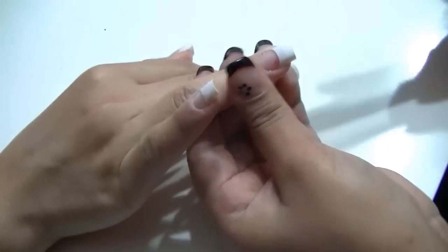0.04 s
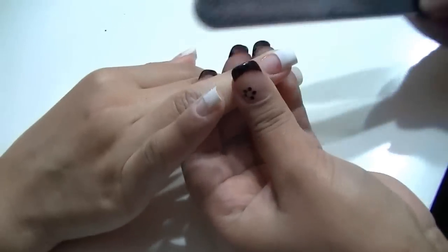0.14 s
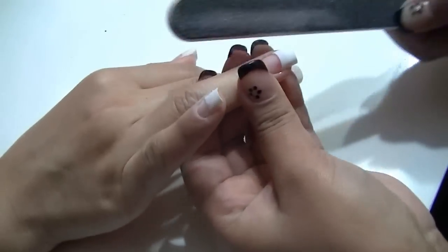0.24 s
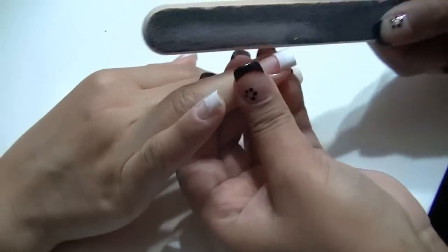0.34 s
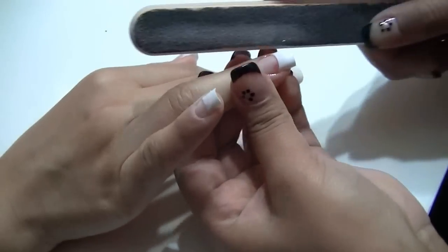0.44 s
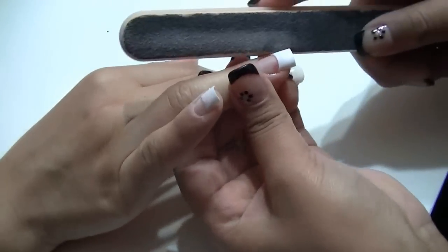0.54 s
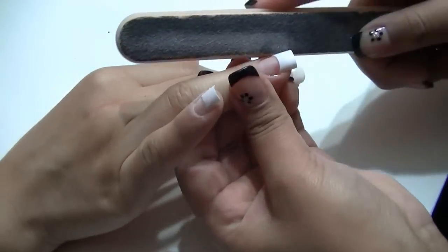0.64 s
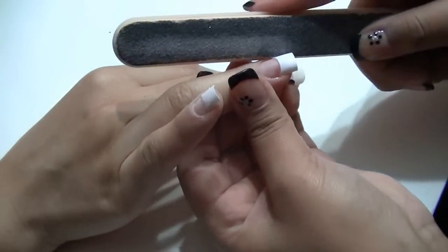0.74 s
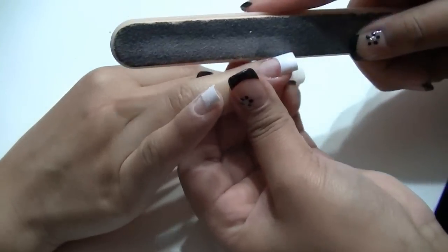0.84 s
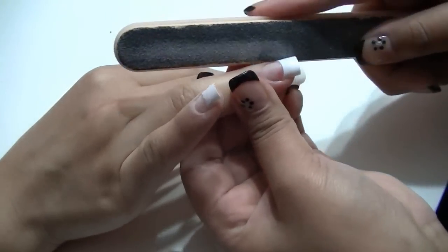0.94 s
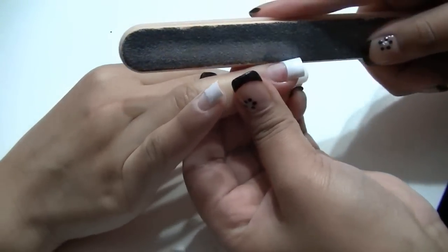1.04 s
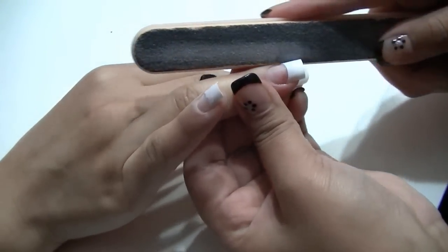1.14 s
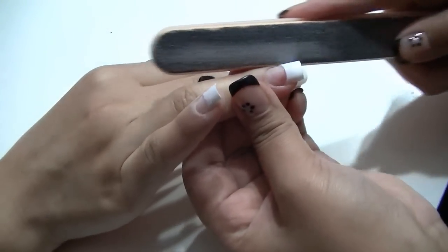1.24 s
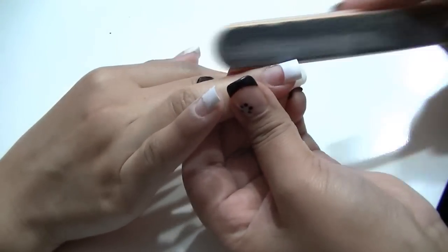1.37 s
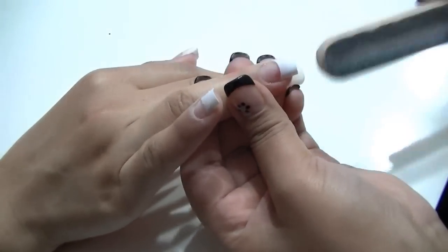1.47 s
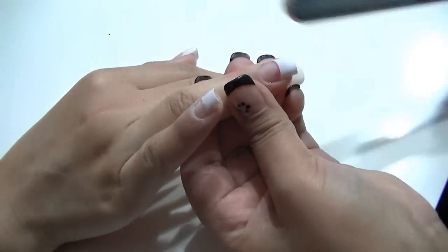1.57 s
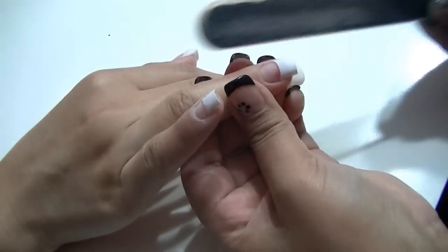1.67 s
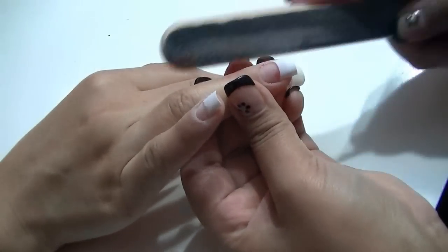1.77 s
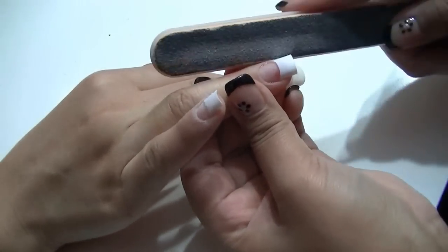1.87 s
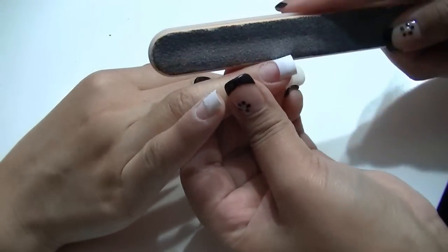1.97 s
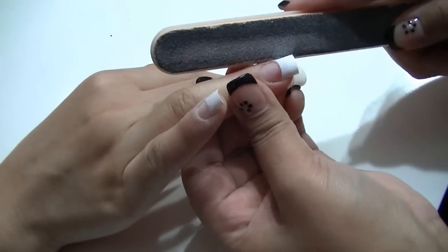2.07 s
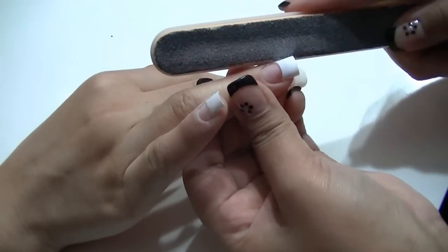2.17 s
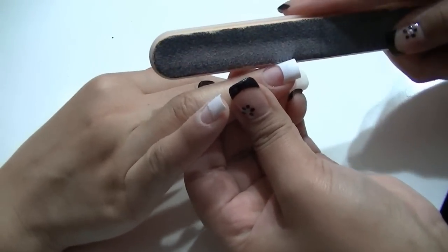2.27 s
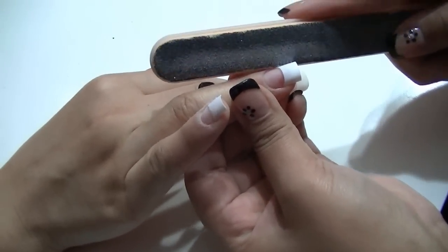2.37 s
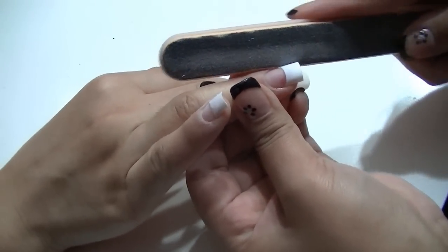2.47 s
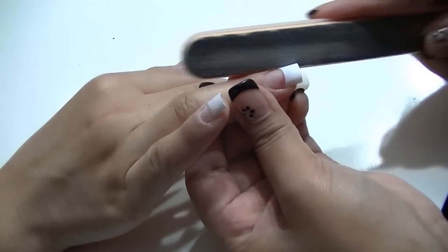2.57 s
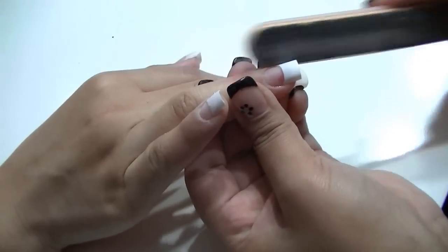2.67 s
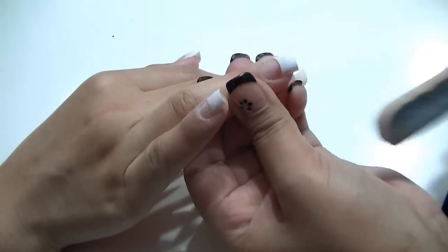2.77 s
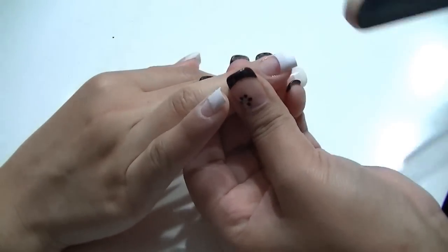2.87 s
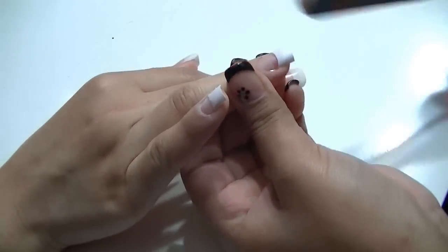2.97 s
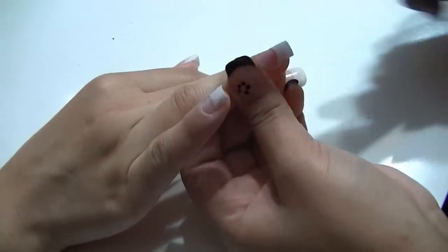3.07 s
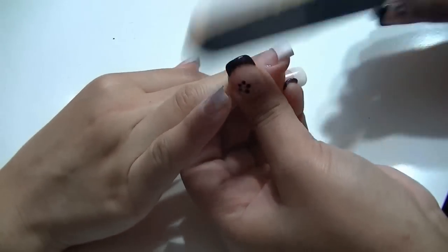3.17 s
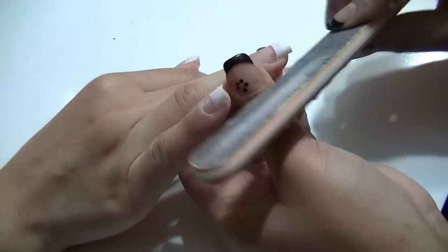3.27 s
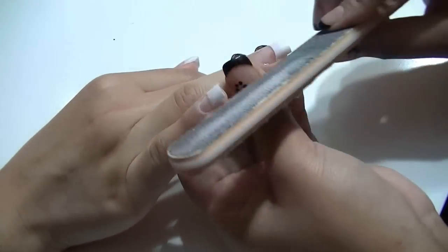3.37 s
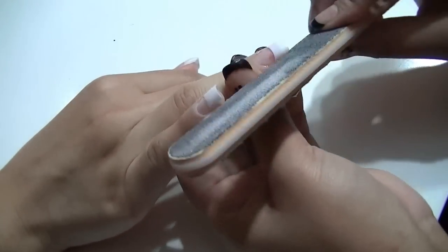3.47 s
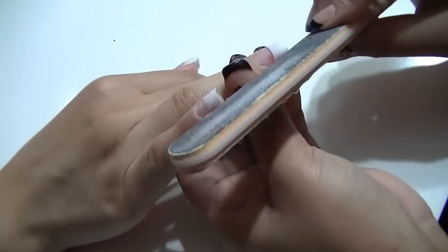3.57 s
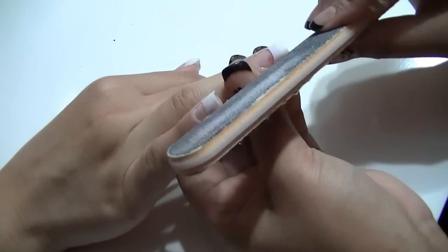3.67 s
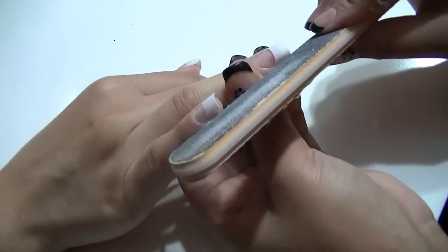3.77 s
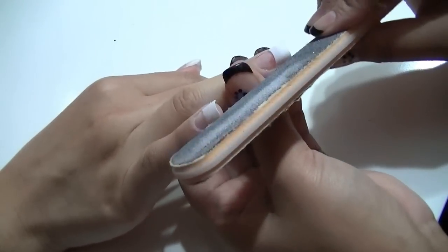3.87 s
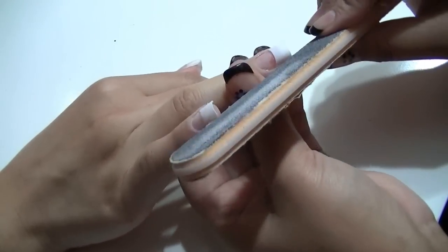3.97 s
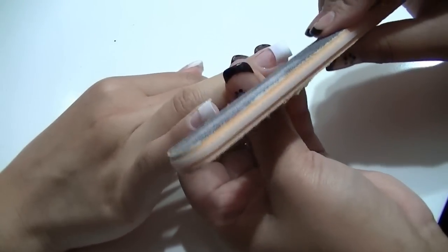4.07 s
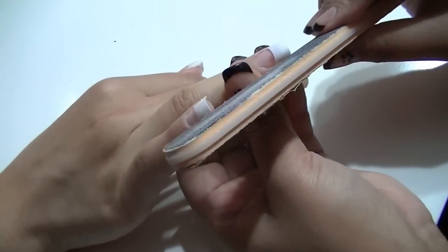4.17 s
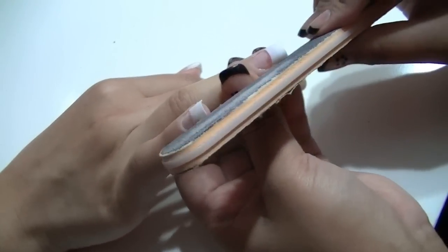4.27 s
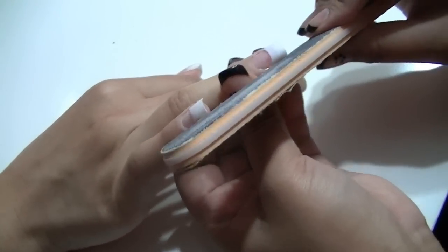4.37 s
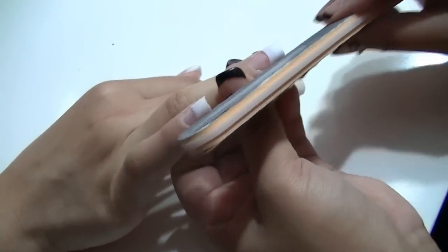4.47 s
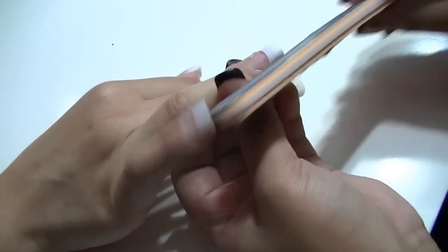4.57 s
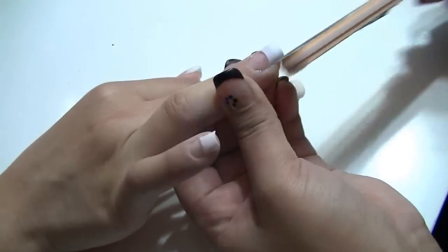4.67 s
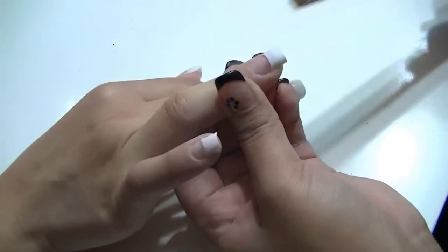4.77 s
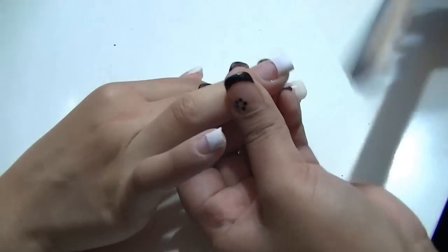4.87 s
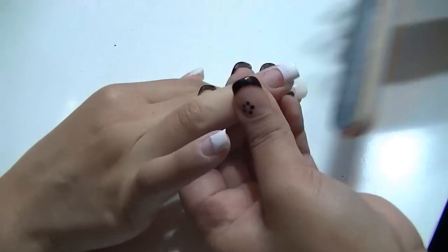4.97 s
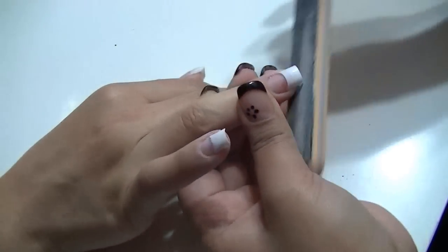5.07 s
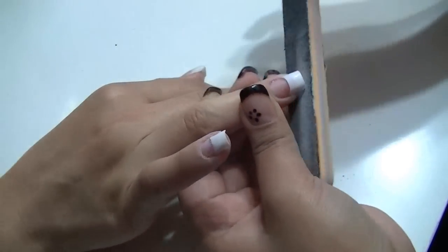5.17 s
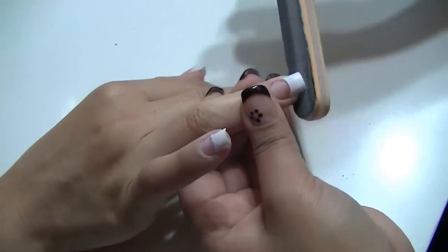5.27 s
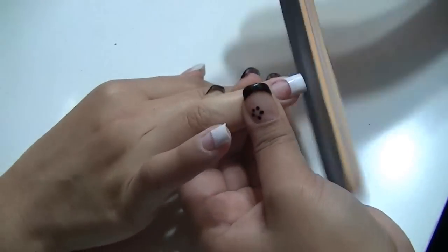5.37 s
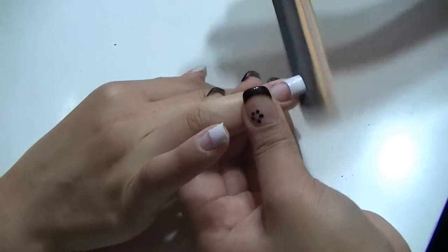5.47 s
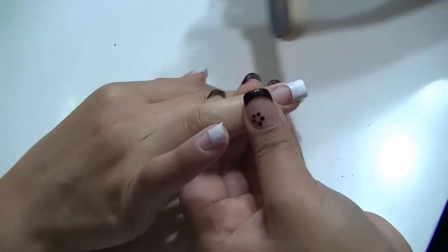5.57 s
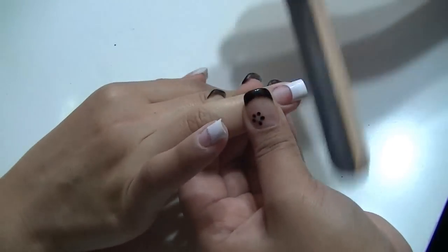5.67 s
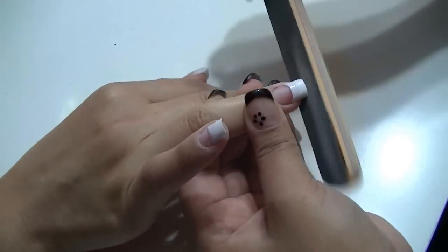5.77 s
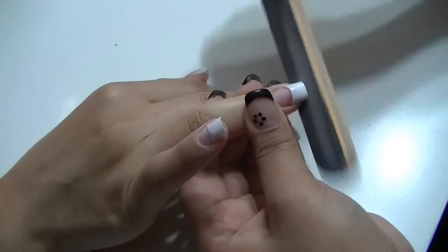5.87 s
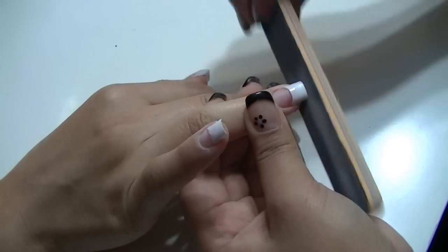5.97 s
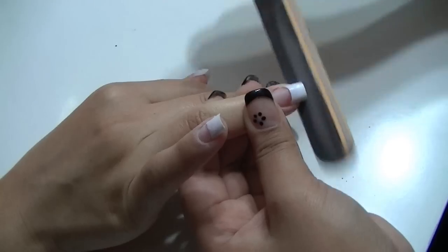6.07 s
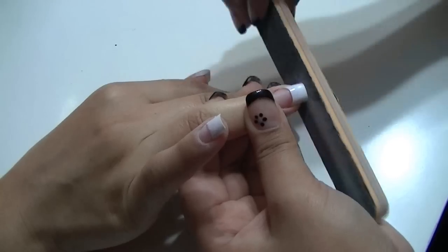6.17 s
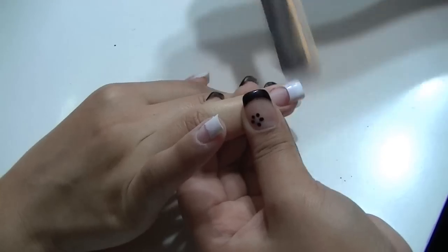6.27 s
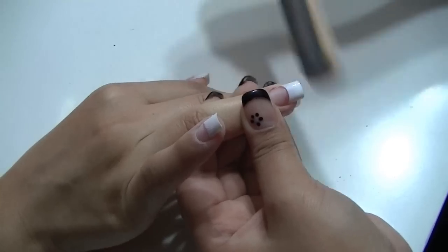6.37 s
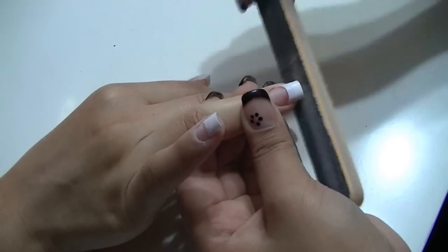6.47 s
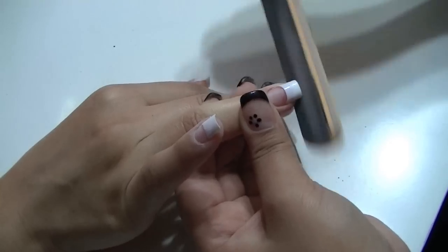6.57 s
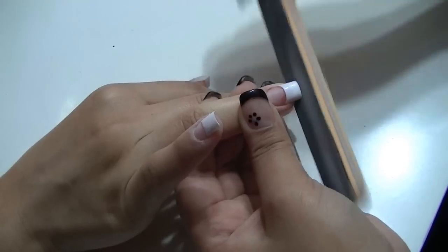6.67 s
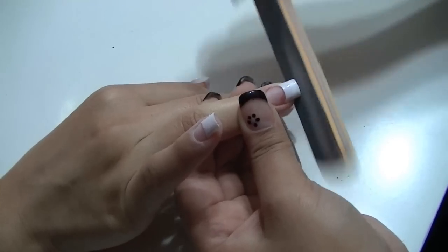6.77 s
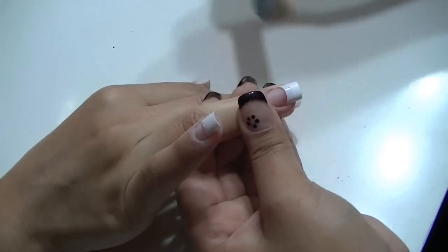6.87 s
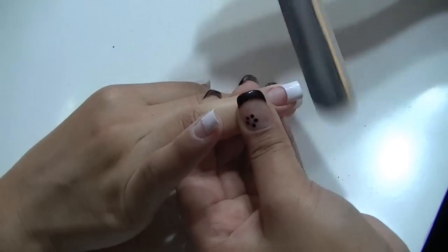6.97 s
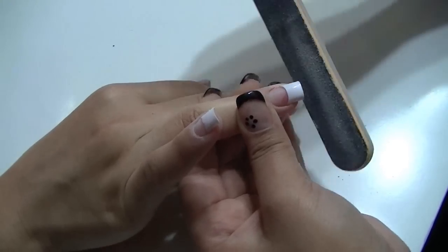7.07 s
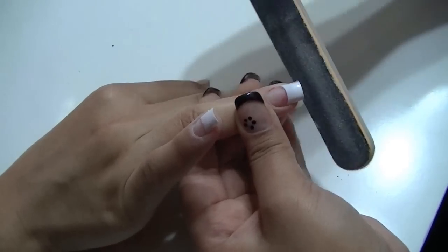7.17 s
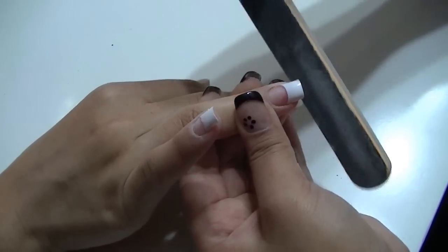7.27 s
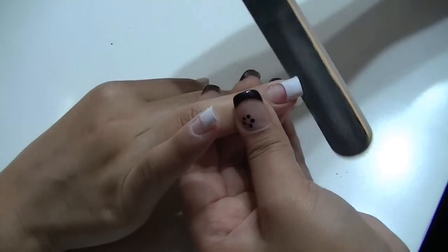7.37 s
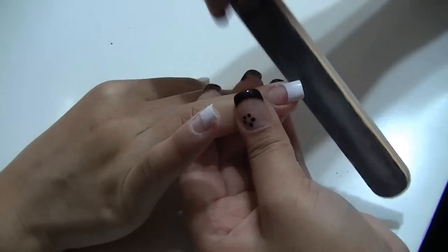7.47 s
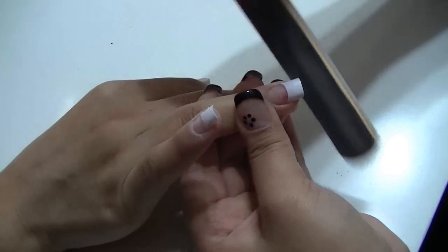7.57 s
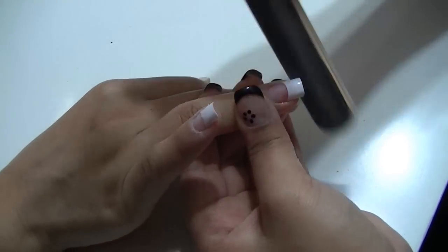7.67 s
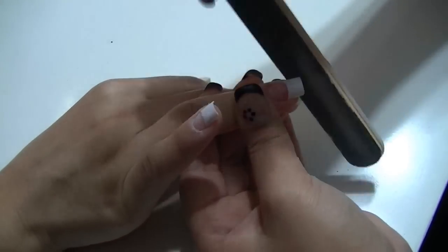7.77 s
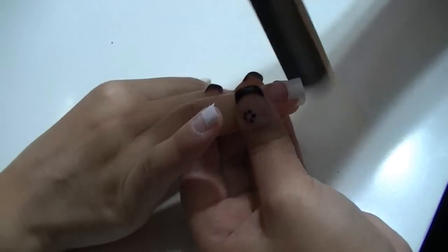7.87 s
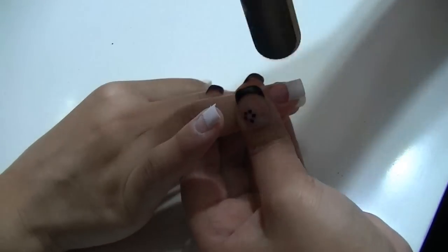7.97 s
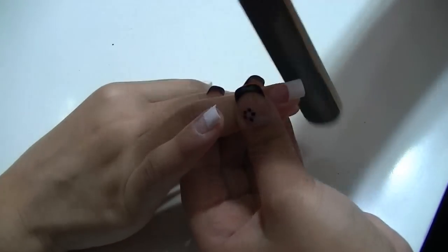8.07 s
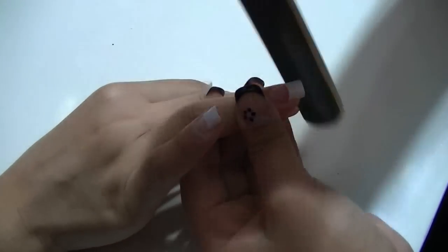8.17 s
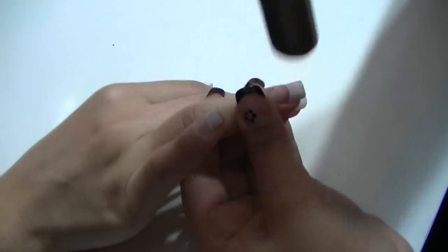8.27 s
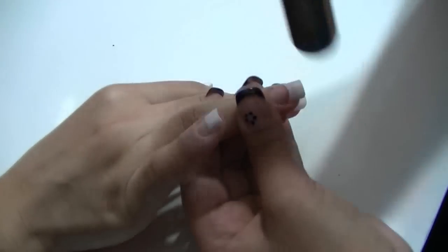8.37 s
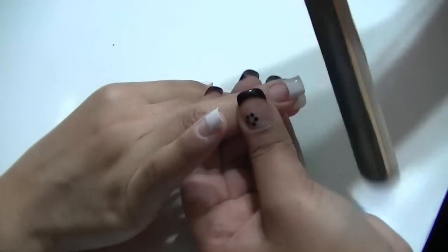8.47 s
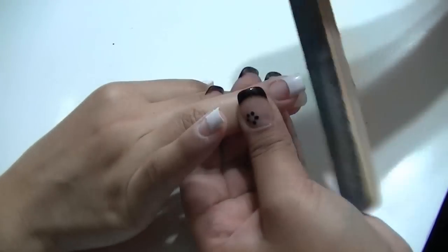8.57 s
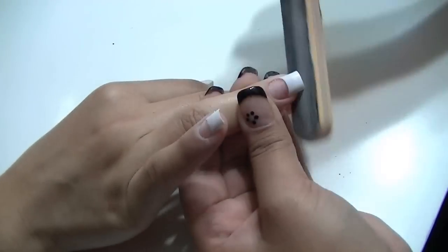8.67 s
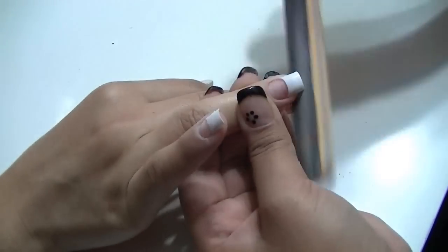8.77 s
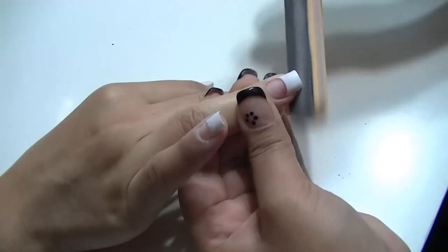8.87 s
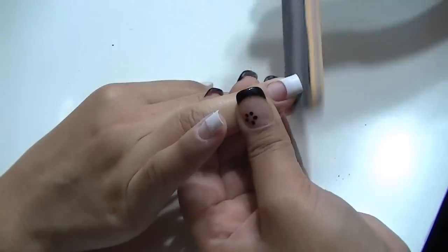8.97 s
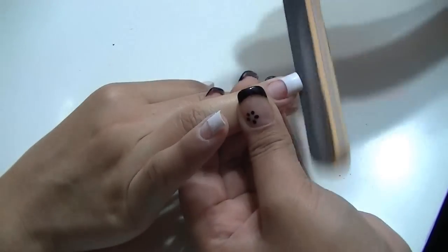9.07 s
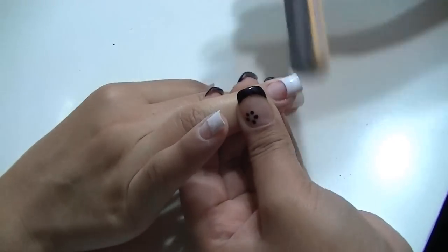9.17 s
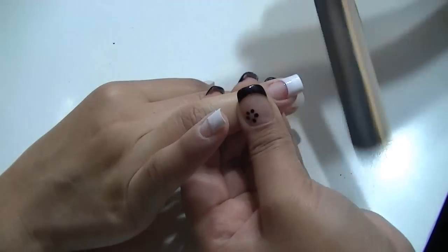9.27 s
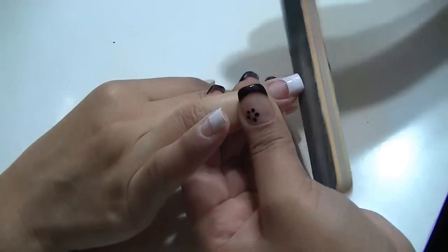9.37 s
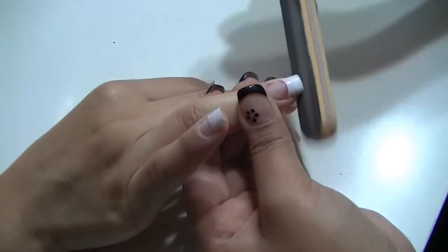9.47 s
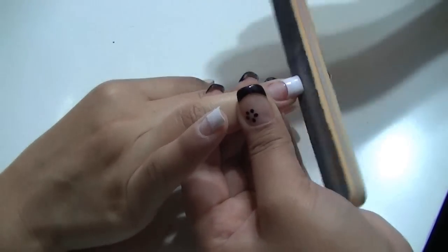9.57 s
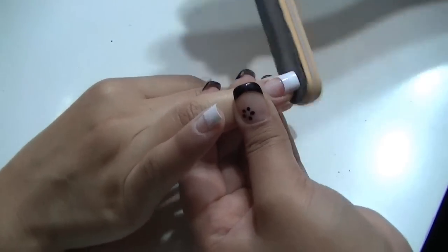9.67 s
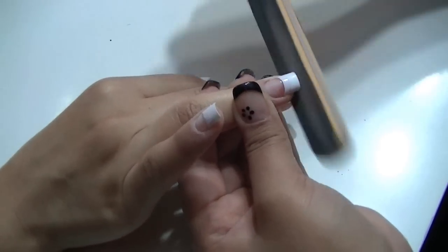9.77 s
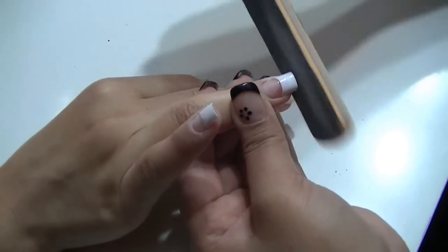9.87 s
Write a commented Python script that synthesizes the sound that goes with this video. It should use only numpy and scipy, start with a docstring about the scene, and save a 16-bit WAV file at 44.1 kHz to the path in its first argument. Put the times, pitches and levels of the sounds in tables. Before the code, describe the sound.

Hands handle a false nail and an emery board close to the microphone. At first there are sparse ticks, smooth light scrapes and dull little bumps on the table. The second half is brisk filing: gritty, hissy back-and-forth strokes with a woody undertone and crackly snags, grouped into four uneven runs. A low appliance hum and soft air noise stay beneath, with only a short room echo.

```python
"""In a small room with a humming appliance, an emery file shapes a false nail tip close to the listener.
Soft sweeps, scuffs and light knocks come first, then four runs of quick back-and-forth strokes.
Grit is noise of uneven level and stick-slip is a train of short bursts; both excite the resonances of
the tip (high) and the file board (lower). Fingers and table ring as damped modes, and echoes are added."""
import sys
import numpy as np
from scipy import signal
from scipy.fft import rfft, irfft
from scipy.io import wavfile
from scipy.ndimage import uniform_filter1d

SR = 44100
rng = np.random.default_rng(int(sys.argv[2]) if len(sys.argv) > 2 else 0)


def generate_wav(sig):
    """Save sig (samples, or channels by samples) to the path in sys.argv[1] as 16-bit PCM at SR."""
    pcm = np.round(np.clip(np.atleast_2d(sig).T, -1, 1) * 32767).astype(np.int16)
    wavfile.write(sys.argv[1], SR, pcm)


N = 437472
TIME = np.arange(N) / SR  # s

# appliance hum: [f/Hz, mean rms level/dB]
HUM = [(99.9, -81), (199.8, -71.5), (299.7, -67), (399.6, -57.5)]
# spectrum of the room air: [f/Hz, relative level/dB]
AIR = [(20, 1), (50, 2.5), (100, -3), (160, 3), (240, 1), (340, 2), (470, -0.5), (700, -4.5), (920, -3),
       (1300, -7), (4000, -11), (7000, -16), (12000, -21), (16000, -27)]
AIR_DB = -59.5  # rms level of the air's mid signal above 600 Hz
# left-right difference of the air: [f/Hz, side re mid level/dB]
AIR_SIDE = [(25, -9), (70, -8), (200, -6.5), (600, -5), (2000, -6.5), (6000, -8.5), (12000, -20.5),
            (16000, -10)]
# left-right difference of the close echoes: [f/Hz, side re echo level/dB]
CLOSE_SIDE = [(100, -27), (500, -23), (1000, -38.5), (2500, -50.5), (4500, -31.5), (8000, -24),
              (12000, -36), (16000, -45)]

# brief scuffs and ticks of file or nails: [centre t/s, length t/s, level/dB, tilt/(dB per octave)]
SCUFFS = [(0.122, 0.0018, -45.5, 1), (0.7605, 0.00077, -33.5, 5), (1.143, 0.0019, -35.5, 3),
          (1.331, 0.002, -27.5, 1.5), (1.5178, 0.0054, -27, 1), (2.15, 0.013, -54, 0.5),
          (2.799, 0.0056, -20, 3.5), (2.8048, 0.0016, -21, -1.5), (2.971, 0.014, -42, 2.5),
          (3.0515, 0.0029, -36.5, 2.5), (3.215, 0.012, -43.5, 2), (3.2591, 0.0025, -35.5, -1),
          (3.419, 0.0047, -52, 1), (3.542, 0.0028, -49.5, -5), (3.7859, 0.0013, -45.5, 1),
          (4.0616, 0.0031, -41.5, 1), (4.4628, 0.0018, -34.5, -1), (4.633, 0.0022, -31.5, 2),
          (4.764, 0.0064, -29, 0), (5.795, 0.001, -37.5, 7), (7.093, 0.0055, -42.5, -7.5),
          (7.14, 0.0046, -52.5, -0.5), (8.0935, 0.0018, -38, 1.5), (8.195, 0.0013, -38.5, 5)]
# spectrum of a scuff before its tilt: [f/Hz, relative level/dB]
SCUFF_COLOUR = [(60, -36.0), (300, -0.5), (900, 1), (2200, 2), (4500, 0), (7000, 2), (11000, -0.5),
                (13500, -10), (16000, -29)]

# the flat of the file sweeps softly over the nail:
# [start t/s, end t/s, final level/dB, swell since the start/dB, finger thrum re grit level/dB]
SWEEPS = [(0.162, 0.25, -61.5, -10, -16), (1.222, 1.491, -40, 14, -12.5), (2.55, 2.813, -44.5, 11.5, -18),
          (3.205, 3.357, -55.5, -7.5, -9), (4.163, 4.198, -57.5, -5, -20), (4.463, 4.768, -40, 8, -23.5),
          (4.872, 4.944, -49, 5, -12)]
# spectrum of the sweeps: [f/Hz, relative level/dB]
SWEEP_COLOUR = [(60, -14), (130, 4.5), (300, 2), (560, 5.5), (800, 5), (1150, -1.5), (2100, 5.5),
                (2800, 1.5), (4400, 4.5), (5400, 2.5), (7000, 5.5), (11000, 3), (13500, -5), (16000, -18)]
SWEEP_ATTACK_S, SWEEP_RELEASE_S = 0.018, 0.023

# light knocks of the hands on the table: [t/s, relative level/dB, top f/Hz of the blow (lower is softer)]
KNOCKS = [(0.578, -26.5, 3600), (0.896, -31, 1600), (2.8053, -32, 3600), (3.26, -34.5, 1500)]
# damped modes of the table: [f/Hz, width f/Hz, weight level/dB]
TABLE_MODES = [(192, 77, -2), (537, 210, -2.5), (882, 70, 7), (990, 130, -12), (1250, 84, -2),
               (1470, 180, -15), (2080, 680, -16), (3120, 290, -9.5)]

# fine ticks while the file creeps on the tip: (start t/s, end t/s, relative level/dB)
CREEP = (0.86, 1.25, -63)
# spectrum of the creep: [f/Hz, relative level/dB]
CREEP_COLOUR = [(3000, -28), (8000, -13), (11500, -3), (14000, -3), (16000, -12)]

# a hand settles on the table with a dull low bump: [t/s, level/dB before decay]
BUMPS = [(2.806, -44), (2.98, -52), (3.535, -53)]
BUMP_HZ, BUMP_DECAY_S = 45, 0.016

# file strokes: [start t/s, end t/s, relative level/dB, late minus early level/dB,
# chatter re grit level/dB and board re grit level/dB, both before fixed offsets]
STROKES = [(5.144, 5.233, -50, -2, -2.5, -3.5), (5.258, 5.362, -34.5, -1, -2, -1),
           (5.379, 5.45, -33.5, 0.5, 1.5, -4.5), (5.486, 5.59, -27, 6, -7, -4.5),
           (5.82, 5.904, -34, 4, -5, -3.5), (5.93, 6.029, -29, -4, -1.5, -7),
           (6.034, 6.124, -28.5, 5.5, -1, -4), (6.145, 6.227, -30, 2, 3.5, -6),
           (6.262, 6.36, -21.5, 0, -13.5, -10), (6.574, 6.665, -30.5, 4, -9, -6.5),
           (6.697, 6.779, -30.5, 2.5, -8, -6.5), (6.809, 6.904, -25, 0, -8.5, -5),
           (7.249, 7.278, -46, -5, 1, 0.5), (7.374, 7.46, -35.5, -5, 4, -9.5),
           (7.493, 7.565, -29, -6, 2, -6.5), (7.601, 7.714, -28, -4.5, 2, -10),
           (7.738, 7.83, -32.5, -9, -6, -7), (7.868, 7.984, -26.5, -2.5, -8.5, -10.5),
           (8.227, 8.314, -27, -4, -7, -7.5), (8.666, 8.779, -34.5, -0.5, -6.5, -7),
           (8.796, 8.858, -35, 6.5, -4, -7), (8.895, 8.998, -31, -1.5, -6, -2.5),
           (9.021, 9.114, -33.5, 11, -12, -8.5), (9.136, 9.245, -31.5, 5.5, -7, -1.5),
           (9.426, 9.536, -38, 2.5, -4, -1.5), (9.556, 9.651, -38, -5.5, 2.5, -3),
           (9.667, 9.763, -29, -3, -3.5, -3), (9.78, 9.873, -39, 21, -11, -7.5)]
# the tip snags on the grit and judders free: [t/s, judder length t/s, relative first snap level/dB]
SNAGS = [(5.392, 0.029, -16), (5.4973, 0.006, -0.5), (5.5422, 0, -8), (5.5618, 0.0017, -4.5),
         (5.5853, 0.0013, -13), (5.8645, 0.0091, -5), (5.9403, 0.071, -2.5), (6.045, 0.00067, -13.5),
         (6.0947, 0.02, -11), (6.149, 0.084, -1), (6.2574, 0.0037, -9.5), (6.6653, 0, -17),
         (6.702, 0.0033, -10), (6.8098, .008, -13), (6.8468, 0.018, -4.5), (6.8957, 0, -12),
         (7.2518, 0.00064, -13), (7.385, .055, -5.5), (7.496, 0.0084, -4.5), (7.6002, 0, -14),
         (7.657, 0.045, -6), (7.743, .006, -7.5), (7.8944, 0.00025, -5.5), (7.9332, 0.0013, -2.5),
         (7.9763, 0, -2), (8.2451, 0.012, -6), (8.914, 0.032, -12), (9.517, 0.001, -17), (9.6685, 0, -13.5),
         (9.8558, 0.0034, -11.5), (9.9177, 0.0034, -12)]
# resonance of the nail tip for each angle at which the file is held: [f/Hz, relative level/dB]
TIP_UPRIGHT = [(3500, -39.5), (4800, -26), (5800, -5.5), (7000, -2.5), (7800, -2.5), (9200, 2.5),
               (10200, 0), (11400, 2.5), (12600, -0.5), (14000, -5.5), (15500, -17), (17000, -39)]
TIP_SLANTED = [(3500, -29.5), (4400, -4.5), (5100, -4.5), (5650, 2), (6700, 2), (7400, -2), (8700, 4),
               (9700, -3), (10900, 6.5), (11700, 4), (12400, -7), (13600, -1.5), (15000, -10), (17000, -60)]
TIP_EDGE_ON = [(3500, -28.5), (4800, -17), (6000, -3.5), (6900, -0.5), (8200, -4), (9200, 3), (10100, -1.5),
               (11000, 2), (12400, -3), (14000, -6.5), (15500, -16), (17000, -44)]
# how each run of strokes is played:
# [from t/s, resonance of the tip, mid-stroke swell level/dB, thrum level/dB for a typical stroke]
RUNS = [(5.0, TIP_UPRIGHT, 3.5, -47), (7.1, TIP_SLANTED, -0.5, -47), (8.5, TIP_EDGE_ON, 5, -48.5),
        (9.35, TIP_EDGE_ON, 5.5, -42.5)]
# resonance of the file board: [f/Hz, relative level/dB]
BOARD = [(200, -24.5), (380, -4), (600, 1), (850, 2.5), (1050, -2.5), (1400, 1.5), (1650, 0), (1950, 4.5),
         (2350, 4.5), (2800, -3), (3200, 1), (4600, -1.5), (7000, -14), (14000, -40.5)]
# damped modes of the fingers that hold file and nail: [f/Hz, width f/Hz, weight level/dB]
FINGER_MODES = [(139.4, 40, -3), (210, 62, 5.5), (313, 180, -2.5)]
LEAD_S = 0.023  # the file brushes the tip this long before it bites
STROKE_DB = -30  # a typical stroke
THRUM_FOLLOW = 0.33  # dB of thrum per dB of stroke
JUDDER_HZ, JUDDER_JITTER = 146.8, 0.22  # nominal slip rate; spread of the log interval
JUDDER_FADE_DB, JUDDER_SPREAD_DB = 6, 1  # fall over one judder; random spread of each slip


def undb(db):
    """Level to amplitude: a gain is ten to the power of its decibels over twenty."""
    return 10 ** (np.asarray(db) / 20)


def rms(x):
    """Effective value: the square root of the mean power."""
    return np.sqrt(np.mean(x ** 2))


def response(points, size=2048):
    """Minimum phase: folding the cepstrum of a (Hz, dB) spectrum gives a causal, unit-energy response."""
    hz, db = np.transpose(points)
    freqs = np.maximum(np.fft.rfftfreq(size, 1 / SR), 1)
    magnitude = undb(np.interp(np.log(freqs), np.log(hz), db))
    cepstrum = irfft(np.log(magnitude))
    cepstrum[1:size // 2] *= 2
    cepstrum[size // 2 + 1:] = 0
    h = irfft(np.exp(rfft(cepstrum)))
    return h / np.linalg.norm(h)


def ring(modes, size=8192):
    """Modal superposition: damped cosines, wider modes dying sooner, scaled to unit energy."""
    t = TIME[:size]
    h = np.zeros(size)
    for hz, width, db in modes:
        decay = np.exp(-np.pi * width * t)
        h += undb(db) * width * decay * np.cos(2 * np.pi * hz * t)
    return h / np.linalg.norm(h)


def through(x, h):
    """Linear response: the output is the excitation convolved with the impulse response."""
    return signal.oaconvolve(x, h)[:N]


def filtered(x, order, hz, kind):
    """Maximally flat (Butterworth) filtering."""
    return signal.sosfilt(signal.butter(order, hz, kind, fs=SR, output="sos"), x)


def add(track, start, x):
    """Superposition: sum x into the track from a given second on."""
    i = int(round(start * SR))
    track[i:i + len(x)] += x[:max(N - i, 0)]


def side_of(x, points):
    """Antiphase pair: a left-right difference whose strength follows (Hz, dB) points."""
    hz, db = np.transpose(points)
    freqs = np.maximum(np.fft.rfftfreq(N, 1 / SR), 1)
    gain = undb(np.interp(np.log(freqs), np.log(hz), db))
    return irfft(rfft(x) * gain, N) * np.array([[1], [-1]])


def reflections(t60_low, t60_high, delay_s, size=22050):
    """Diffuse reverberation: unit-energy noise decaying at separate rates below and above 2.5 kHz."""
    t = TIME[:size]
    noise = rng.standard_normal(size)
    low = filtered(noise, 1, 2500, "low")
    low_tail = low * undb(-60 * t / t60_low)
    high_tail = (noise - low) * undb(-60 * t / t60_high)
    h = (low_tail + high_tail) * (t > delay_s)
    return h / np.linalg.norm(h)


def background():
    """Tonal and broadband noise: gently wavering hum harmonics over stereo air."""
    hum = np.zeros(N)
    for hz, db in HUM:
        hum += np.sqrt(2) * undb(db) * np.sin(2 * np.pi * (hz * TIME + rng.random()))
    waver = np.interp(TIME, np.linspace(0, TIME[-1], num=40), rng.standard_normal(size=40))
    h = response(AIR)
    mid = through(rng.standard_normal(N), h)
    side = through(rng.standard_normal(N), h)
    treble = filtered(mid, 4, 600, "high")
    air = (mid + side_of(side, AIR_SIDE)) * undb(AIR_DB) / rms(treble)
    return hum * undb(0.5 * waver) + air


def scuffs():
    """Transient friction: milliseconds of scraping as an edge touches or slides off the tip."""
    out = np.zeros(N)
    for t, length, db, tilt_db in SCUFFS:
        u = np.linspace(-2, 2, int(4 * length * SR))  # time from the centre, in lengths
        scrape = undb(db) * np.exp(-np.pi * u ** 2 / 2) * rng.standard_normal(len(u))
        h = response([(hz, c + tilt_db * np.log2(hz)) for hz, c in SCUFF_COLOUR])
        add(out, t - 2 * length, np.convolve(scrape, h))
    return out


def grit(spread_db, size=14):
    """Abrasive friction: grains of uneven size, each scratching for a third of a millisecond."""
    grain_gain = undb(spread_db * rng.standard_normal(N // size + 1))
    x = rng.standard_normal(N) * np.repeat(grain_gain, size)[:N]
    return x / rms(x)


def thrum(gain):
    """Damped resonance: rubbing shakes the fingers; flesh keeps moving through the turn of a stroke."""
    shaking = uniform_filter1d(gain, size=1800) * rng.standard_normal(N)
    return filtered(through(shaking, ring(FINGER_MODES)), 2, [95, 400], "band")


def sweeps():
    """Light friction: fine grit without chatter settles to a steady level until the file lifts."""
    gain, fingers = np.zeros((2, N))
    for start, end, db, swell_db, thrum_db in SWEEPS:
        t = TIME[:int((end - start + SWEEP_RELEASE_S) * SR)]
        attack = np.minimum(t / SWEEP_ATTACK_S, 1)
        release = np.minimum((t[-1] - t) / SWEEP_RELEASE_S, 1)
        level = attack * release * undb(db - swell_db * (1 - t / t[-1]) ** 2)
        add(gain, start, level)
        add(fingers, start, level * undb(thrum_db))
    return through(gain * grit(spread_db=4.5), response(SWEEP_COLOUR)) + thrum(fingers)


def knocks():
    """Impact excitation: band-limited blows ring the table's modes and a short diffuse tail."""
    blows = np.zeros(N)
    for t, db, top_hz in KNOCKS:
        push = filtered(signal.unit_impulse(2048), 2, [170, top_hz], "band")
        add(blows, t, undb(db + 17.5) * push)
    top = through(blows, ring(TABLE_MODES))
    return top + undb(-2.5) * through(top, reflections(t60_low=0.12, t60_high=0.08, delay_s=0.0019))


def stick_slip(rate_hz, jitter, spread_db, rebound, count=5000):
    """Stick-slip: uneven slips, each with an uneven rebound typically within a millisecond or two."""
    chance = rng.standard_normal((count, 4))
    times = np.cumsum(np.exp(jitter * chance[:, 0])) / rate_hz
    sizes = undb(spread_db * np.tanh(chance[:, 1]))
    rebound_times = times + 0.00067 * np.exp(0.4 * chance[:, 2])
    rebound_sizes = rebound * sizes * chance[:, 3]
    x = np.zeros(N)
    for t, a in ((times, sizes), (rebound_times, rebound_sizes)):
        inside = t < TIME[-1]
        x[(t[inside] * SR).astype(int)] += a[inside]
    return x / rms(x)


def creep():
    """Slow stick-slip: the file barely moves, and its tiny slips sound mainly in the top treble."""
    start, end, db = CREEP
    slips = stick_slip(rate_hz=36, jitter=0.37, spread_db=1, rebound=0.3)
    moving = (TIME > start) * (TIME < end)
    return undb(db) * through(slips * moving, response(CREEP_COLOUR))


def bumps():
    """Damped oscillation: the weight of a hand rocks the table for a cycle or two."""
    out, t = np.zeros(N), TIME[:8192]
    for start, db in BUMPS:
        add(out, start, undb(db) * np.exp(-t / BUMP_DECAY_S) * np.sin(2 * np.pi * BUMP_HZ * t))
    return out


def snap(x, size=14):
    """Finite slip duration: each kick spreads over a random burst of about a third of a millisecond."""
    at = np.flatnonzero(x[:-size])
    bursts = rng.standard_normal((len(at), size)) * np.linspace(1, 0.3, size)
    bursts *= x[at, None] / np.linalg.norm(bursts, axis=1, keepdims=True)
    out = np.zeros(N)
    np.add.at(out, at[:, None] + np.arange(size), bursts)
    return out


def judders(count=24):
    """Relaxation oscillation: a snag snaps, then catches and slips unevenly, fading as the tip works free."""
    kicks = np.zeros(N)
    chances = rng.standard_normal((len(SNAGS), 2, count))
    for (start, length, db), (gaps, sizes) in zip(SNAGS, chances):
        add(kicks, start, undb([db]))
        times = np.cumsum(np.exp(JUDDER_JITTER * gaps)) / JUDDER_HZ
        for t, size in zip(times, sizes):
            if t < length:
                add(kicks, start + t, undb([db - JUDDER_FADE_DB * t / length + JUDDER_SPREAD_DB * size]))
    return snap(kicks, size=13)


def run_at(t):
    """Contact state: tip resonance, swell and thrum of the run of strokes at a given second."""
    return [row[1:] for row in RUNS if row[0] <= t][-1]


def pressure(length, level_db, lean_db, swell_db, edge_s, edge_db, lead_db):
    """Friction envelope: the file brushes in, bites, changes level towards midway and fades at the turn."""
    t = np.arange(int((length + LEAD_S) * SR)) / SR - LEAD_S
    place = np.clip(3 * (t / length - 1 / 2), -1, 1)  # 0 at mid-stroke
    db = level_db + lean_db * place / 2 - swell_db * place ** 2
    turning = np.exp(-np.maximum(t, 0) / edge_s) + np.exp((t - t[-1]) / edge_s)
    brushing = np.sqrt(np.maximum(-t, 0) / LEAD_S)
    return undb(db - edge_db * turning - lead_db * brushing)


def shifted(points, spread_db, detune):
    """Moving boundary: a shifted contact point retunes and recolours the resonance a little."""
    scale = np.exp(detune * rng.standard_normal())
    return response([(hz * scale, db + spread_db * rng.standard_normal()) for hz, db in points])


def filing():
    """Source and resonator: grit and slips drive tip and board; the fingers thrum with each stroke."""
    # worn and fresh patches of the abrasive pass under the tip every few milliseconds
    patches = np.interp(TIME, np.linspace(0, TIME[-1], num=2500), rng.standard_normal(size=2500))
    grains = grit(spread_db=3.0) * undb(1.1 * patches)
    slips = snap(stick_slip(rate_hz=205, jitter=0.33, spread_db=10.0, rebound=1.0))
    tip, board, fingers, out = np.zeros((4, N))
    for start, end, level_db, lean_db, chatter_db, board_db in STROKES:
        _, swell_db, thrum_db = run_at(start)
        gain = pressure(end - start, level_db, lean_db, swell_db, edge_s=0.0041, edge_db=13.5, lead_db=18.5)
        touch = start - LEAD_S
        here = np.minimum(int(touch * SR) + np.arange(len(gain)), N - 1)
        add(tip, touch, gain * (grains[here] + undb(chatter_db + 2.5) * slips[here]))
        # a softer contact: the board feels the slips less
        board_force = grains[here] + undb(chatter_db - 14.5) * slips[here]
        add(board, touch, gain * undb(board_db) * board_force)
        finger_gain = undb(thrum_db + THRUM_FOLLOW * (level_db - STROKE_DB))
        add(fingers, start, np.full(int((end - start) * SR), finger_gain))
    snags = judders()
    tip = tip + undb(8.5) * snags
    board = board + undb(-7) * snags
    turns = [int((row[0] - LEAD_S) * SR) for row in STROKES] + [N]
    for i, j in zip(turns, turns[1:]):
        colour = run_at(i / SR)[0]
        add(out, i / SR, signal.oaconvolve(tip[i:j], shifted(colour, spread_db=3.07, detune=0.018)))
        # the free length of the board changes as it slides, so its ring shifts within a stroke
        travel = np.clip(TIME[:j - i] / 0.17, 0, 1)
        for share in (1 - travel, travel):
            board_ring = shifted(BOARD, spread_db=1.5, detune=0.01)
            add(out, i / SR, signal.oaconvolve(share * board[i:j], board_ring))
    return out + thrum(fingers)


def scene():
    """Direct and reflected sound: close sources, quick echoes off hands and table, and the small room."""
    close = scuffs() + sweeps() + knocks() + creep() + filing()
    near = undb(-17.5) * through(close, reflections(t60_low=0.013, t60_high=0.05, delay_s=0.00026))
    room = undb(-15.5) * through(close, reflections(t60_low=0.34, t60_high=0.22, delay_s=0.005))
    # the echoes differ a little between left and right
    echoes = through(close, reflections(t60_low=0.041, t60_high=0.09, delay_s=0.0005))
    return background() + close + near + room + side_of(echoes, CLOSE_SIDE) + bumps()


def record(dry):
    """Amplitude and band limiting: peaks are clipped at 0.78, then the top is cut steeply at 16.3 kHz."""
    capped = np.clip(dry, -0.78, 0.78)
    return signal.sosfilt(signal.ellip(8, 0.2, 70, 16300, fs=SR, output="sos"), capped)


dry = scene()
out = record(dry)
generate_wav(out)
```